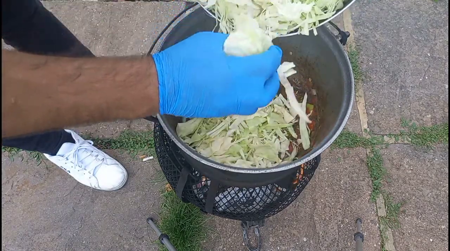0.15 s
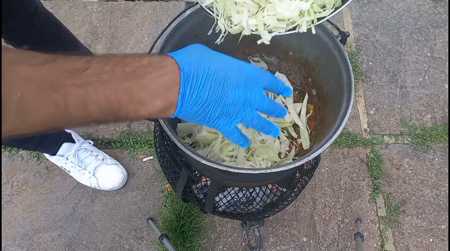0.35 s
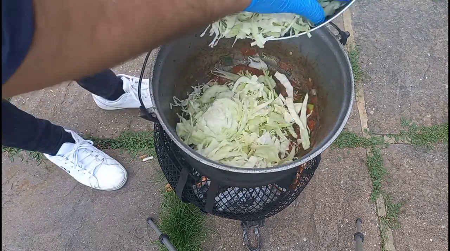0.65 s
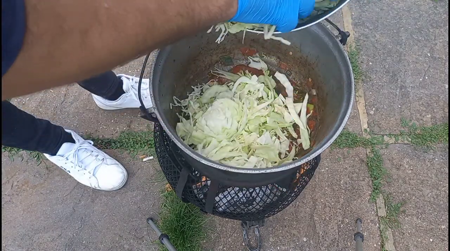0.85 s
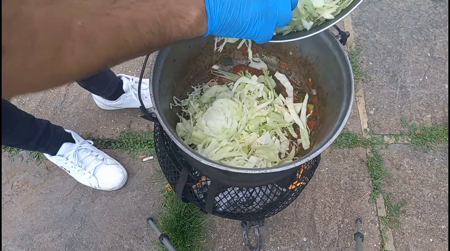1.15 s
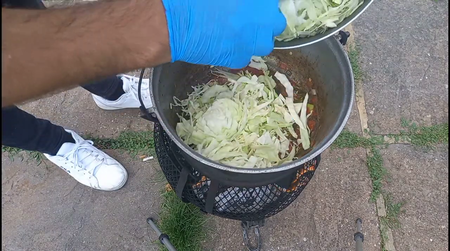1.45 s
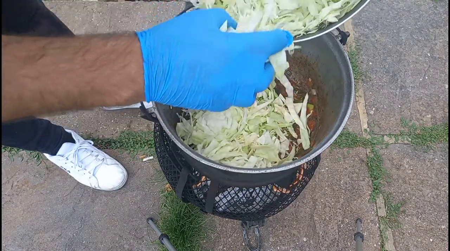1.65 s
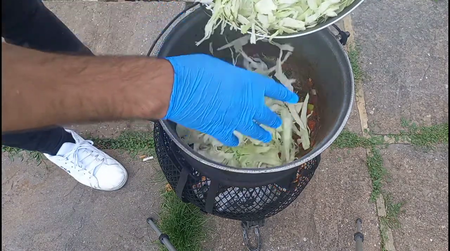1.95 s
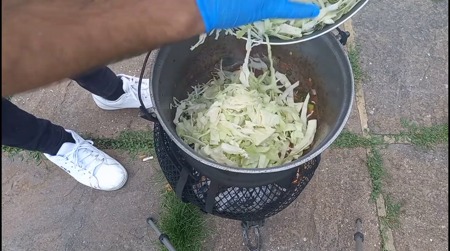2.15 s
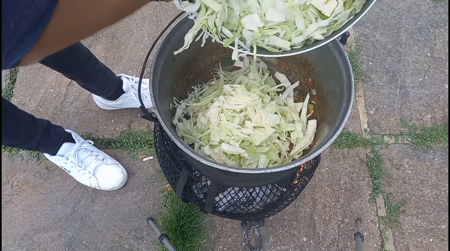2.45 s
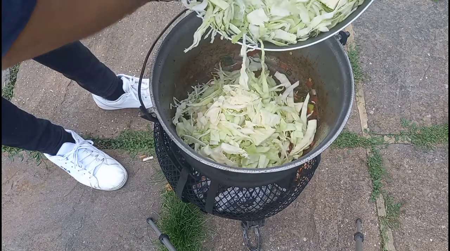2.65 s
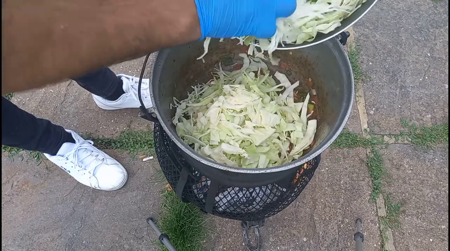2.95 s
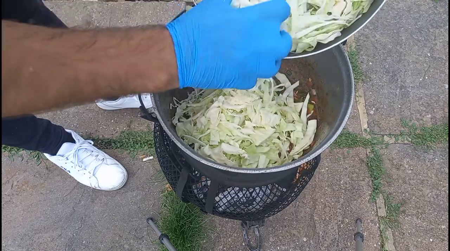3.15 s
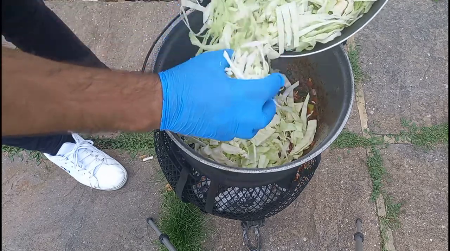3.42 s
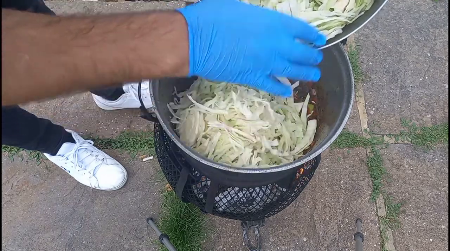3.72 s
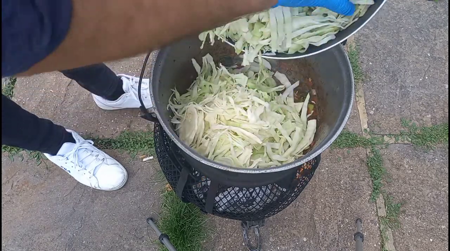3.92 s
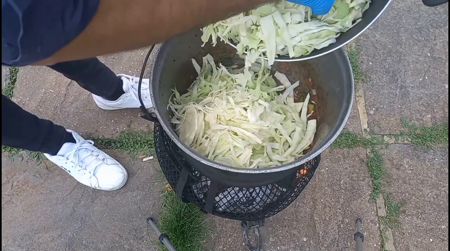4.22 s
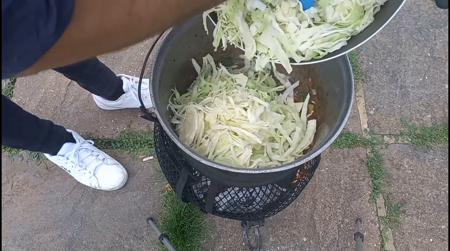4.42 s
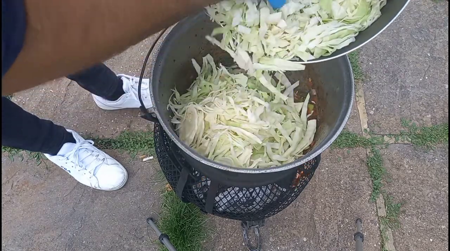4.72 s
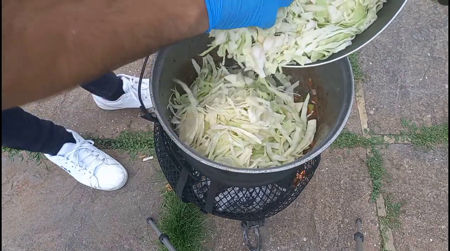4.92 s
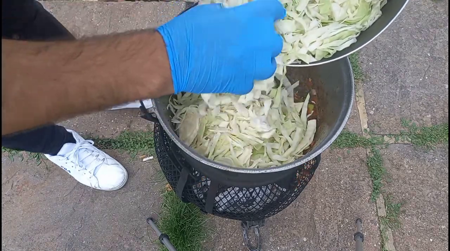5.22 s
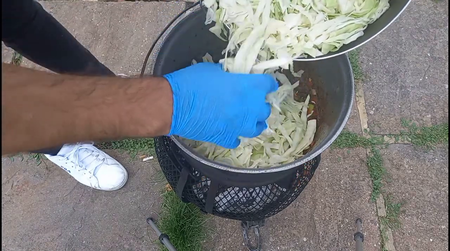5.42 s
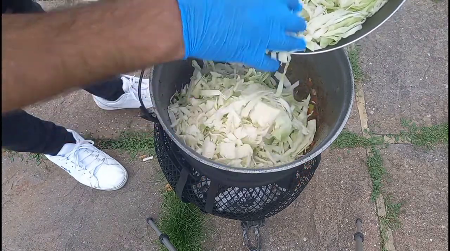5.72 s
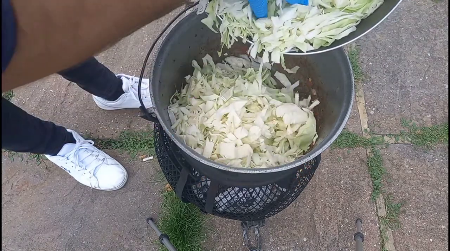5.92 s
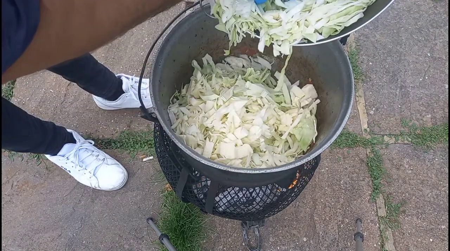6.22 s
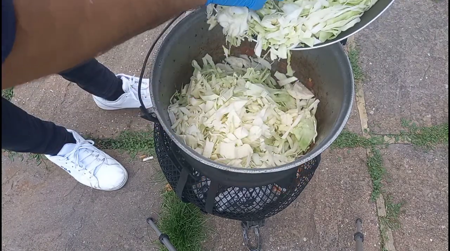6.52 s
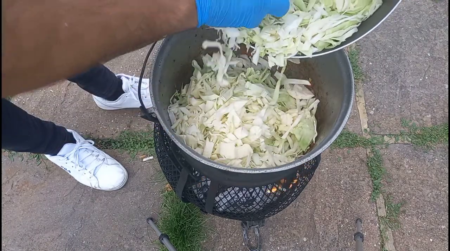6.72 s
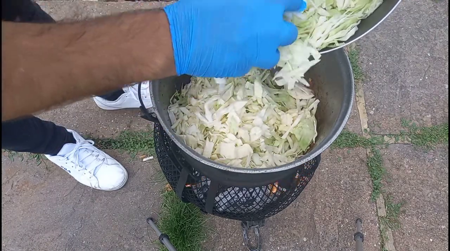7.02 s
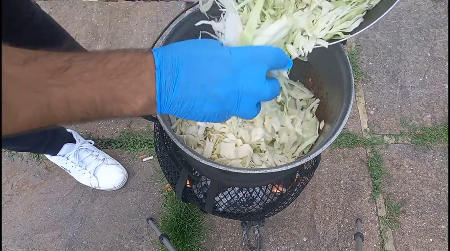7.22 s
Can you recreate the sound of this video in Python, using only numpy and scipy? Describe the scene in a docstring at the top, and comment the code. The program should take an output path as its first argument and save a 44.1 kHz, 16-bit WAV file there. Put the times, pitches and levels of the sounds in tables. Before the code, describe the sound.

Close outdoor sound of a pot sizzling over a fire, growing quieter as shredded cabbage covers the sauce. Leaves rustle in soft handfuls, with brittle snaps and a glove rubbing a metal bowl. Two small metallic knocks come early and near the middle, then a strong burst of hollow thumps and crunchy scraping, followed by gentler rakes. Low wind bumps the microphone.

```python
"""Raking cabbage into a sizzling pot

Sauce sizzles in an iron pot over a fire outdoors while a gloved hand rakes shredded cabbage out of a metal bowl.
Sizzle and leaves are grainy noise; rubs and thumps ring the bowl; knocks are bursts of noise that ring metal.
Snaps are short tones with noise. Low lumpy noise is wind on the microphone, over a steady outdoor murmur.
"""
import sys
import numpy as np
from scipy import signal
from scipy.fft import rfft, irfft, next_fast_len
from scipy.io import wavfile

SR = 44100
rng = np.random.default_rng(int(sys.argv[2]) if len(sys.argv) > 2 else 0)


def materialize(psi):
    """Save the field psi as 16-bit PCM at rate SR to the path in sys.argv[1].

    A 1-D psi becomes a single channel; in a 2-D psi each row is a channel.
    """
    bounded = np.clip(np.atleast_2d(psi).T, -1, 1)
    quanta = np.round(bounded * 32767).astype(np.int16)
    wavfile.write(sys.argv[1], SR, quanta)


N = 325017

# Wind over time: start_s, deep_db, upper_db, left_minus_right_db
WIND = [(0.0, -58, -45, 1.5), (.1, -60, -61.5, 0), (.3, -49.5, -52, 3), (.6, -61, -57, 1),
        (.9, -51.5, -57.5, -2.5), (1.07, -66, -64, -2), (1.4, -56, -57.5, -0.5), (1.62, -52, -57, 1),
        (1.8, -75, -66, 1), (2.15, -59.5, -60, 2.5), (2.35, -70, -66, -1), (2.95, -70, -65.5, 0.5),
        (3.15, -72, -58.5, -4), (3.6, -76, -70, 0), (4.45, -72, -57, -1), (4.62, -56, -51.5, -1),
        (5.05, -70, -62.5, 0), (5.22, -54.5, -54, -0.5), (5.85, -69, -64.5, -3.5), (6.1, -55, -52, 0.5),
        (6.5, -58, -60, 1.5), (7.05, -53, -57, 5), (7.19, -70, -65, 11), (7.31, -48, -51.5, 11),
        (7.37, -57, -58, -2)]
# The sauce quietens as cabbage covers it: start_s, level_db
SIZZLE = [(0.0, -60.5), (1.1, -60), (1.6, -64.5), (3.5, -70.5), (5.8, -71), (7.37, -70.5)]
# Tone colour of the outdoor murmur: pitch_hz, relative level_db (per Hz)
AIR_COLOUR = [(76, -18), (130, -3), (174, -1), (408, -3), (516, -13), (796, -5.5), (1230, -15),
              (2560, -24.5), (3000, -86), (3900, -38), (6600, -120)]
# Tone colour of the frying: pitch_hz, relative level_db (per Hz)
SIZZLE_COLOUR = [(880, -42), (1500, -6), (2260, -9), (2470, -5.5), (2890, -0.5), (3950, -2), (5720, -3),
                 (15500, -16.5)]
# Tone colour of the leaves: pitch_hz, relative level_db (per Hz)
LEAF_COLOUR = [(500, -12), (900, -1), (1800, 0.5), (5000, 1.5), (9000, 1), (14000, 4), (16000, -7)]
# How alike left and right are: pitch_hz, likeness (1 = the same, 0 = unrelated)
LIKENESS = [(60, 0.91), (130, 0.81), (290, 0.88), (640, -0.0068), (1410, 0.78), (3100, 0.21), (6820, 0.13),
            (15000, -0.14)]
# Ringing modes of the bowl: pitch_hz, width_hz, relative level_db
BOWL_MODES = [(255, 73, -6), (366.2, 81, 6.5), (382.6, 13.3, -6.5), (426.4, 74, 5), (524, 94, -15),
              (641, 90, -7), (764, 51, -12), (984, 58, -15), (1313, 190, -10), (1493, 330, -17.5),
              (1804, 58, -16.5), (2410, 84, -16)]
# Soft thumps on the bowl: start_s, level_db (before the soft rise), favoured_pitch_hz
THUMPS = [(0.672, -41.5, 370), (1.97, -42, 368), (2.358, -35.5, 336), (2.541, -43, 393),
          (3.088, -42.5, 246), (3.13, -39, 248), (3.172, -45, 330), (4.095, -43, 343), (4.156, -29, 443),
          (4.265, -24.5, 664), (4.301, -18, 450), (4.358, -20.5, 535), (4.39, -29, 396),
          (4.479, -42.5, 428), (4.691, -31, 420), (4.826, -36, 480), (4.755, -38, 420), (4.914, -38, 247),
          (4.969, -37, 345), (5.999, -28.5, 348), (6.02, -41, 250), (6.074, -36, 400), (6.14, -39, 400),
          (6.19, -43, 400), (6.264, -42, 1400), (6.46, -51, 1510)]
# Metal knocks and scuffs: start_s, crack_db, rattle_t60_s, ring_drive_db, favoured_pitch_hz
KNOCKS = [(1.158, -65, 0.27, -61, 2100), (1.181, -66, 0.21, -57.5, 3080), (1.2491, -30, 0.027, -53, 4020),
          (1.2535, -39, 0.036, -51, 3700), (1.263, -56, 0.12, -54.5, 2980),
          (3.0729, -30.5, 0.032, -40, 3760), (3.0775, -42, 0.056, -47, 2340),
          (3.0867, -31, 0.023, -42.5, 2020), (3.09, -60, 0.065, -44.5, 202), (3.101, -52, 0.13, -47, 3200),
          (3.135, -73, 0.19, -48.5, 199), (3.175, -65, 0.24, -60, 850)]
# Ringing modes of the knocked metal: pitch_hz, relative level_db, t60_s
METAL_MODES = [(162, -0.5, 0.12), (224.7, 2, 0.13), (800, 2, 0.14), (910, 5, 0.1), (1350, -1, 0.084),
               (1540, -14, 0.1), (2091, -4, .35), (2097, -8, .25), (2450, 0, 0.036), (2770, -4, 0.078),
               (2930, 0, 0.063), (3270, -1, 0.08), (3660, -3, 0.094), (3700, -1, 0.071), (4370, -6, 0.036),
               (6740, -4, 0.036)]
# Tone colour of the cracks: pitch_hz, relative level_db (per Hz)
CRACK_COLOUR = [(700, -12), (2000, -14), (3800, 0.5), (7000, 2.5), (10000, -5.5), (16000, -15.5)]
# Snaps and crunches of leaves and embers, each at a set time: start_s, level_db, pitch_hz, left_minus_right_db
SNAPS = [(0.308, -54, 6760, -1), (0.8586, -47, 7250, -1), (2.5217, -47, 7400, -3), (2.5565, -44, 8840, 1),
         (2.747, -44, 7160, 0), (2.8695, -60, 7300, -13), (3.9926, -40.5, 11400, -1),
         (4.2956, -39, 7660, -2), (5.1063, -27.5, 8470, -1), (5.2718, -50, 12200, 0),
         (5.3664, -46.5, 8660, -1), (5.3951, -49, 11200, 0), (5.9666, -38, 7860, 2),
         (6.0255, -43, 7150, -1), (6.223, -50, 3260, -4), (6.272, -52, 6800, 0), (6.437, -41, 3070, 3),
         (6.4722, -43.5, 3630, -4.5), (7.3013, -51, 4800, 3)]
# Faint thin tones: start_s, end_s, pitch_hz, width_hz, level_db
THIN_TONES = [(0.01, .25, 1670, 200, -77), (.28, 0.527, 1710, 160, -70), (6.13, 6.356, 1460, 120, -66),
              (5.186, 5.802, 987, 120, -76), (5.583, 5.793, 1570, 15, -76.5), (5.667, 5.74, 2090, 30, -80),
              (7.073, 7.12, 6900, 400, -73)]
# Rustles of the cabbage: peak_s, rise_s, fall_s, level_db, lows_boost_db (rise and fall cover 20 dB)
RUSTLES = [(0.0, .05, 0.45, -67, 12), (.45, 0.055, 0.077, -51.5, 7), (.69, 0.033, 1, -59.5, 0.5),
           (1.05, 0.64, .5, -60.5, 3.5), (1.28, 0.15, 0.15, -59, 13), (1.98, 0.045, 0.12, -55.5, 6),
           (2.37, 0.062, 0.34, -56.5, -9), (2.55, 0.098, 1, -52.5, 2), (2.72, 0.22, 0.11, -58, 1),
           (3.0, 0.034, 0.046, -69, -9), (3.12, 0.039, 0.24, -61, 16), (3.64, 0.077, 0.099, -57.5, 5),
           (3.995, 0.044, 0.14, -57, -21), (4.2, 0.21, 0.09, -47.5, 2), (4.27, 0.08, 0.044, -45.5, 10.5),
           (4.32, 0.086, .15, -43, -3), (4.385, 0.12, 0.028, -47.5, 14.5), (4.67, 0.26, 0.49, -49, -0.5),
           (4.86, 0.078, 0.075, -57.5, 1), (5.12, 0.038, 0.72, -62.5, 3), (5.38, 0.16, 0.13, -62, -14),
           (5.56, .06, 0.17, -58.5, 3), (5.97, 0.074, 0.17, -56.5, -13), (6.02, 0.048, 0.33, -55, 2),
           (6.17, 0.26, 0.17, -54.5, 4), (6.275, 0.16, 0.11, -50, 6.5), (6.36, .1, 0.36, -54.5, 2.5),
           (6.47, 0.11, 0.2, -58, 9), (6.56, 0.16, 0.37, -58, 2.5), (6.8, 0.34, 0.55, -65.5, -7),
           (7.3, 0.43, 0.42, -65, 3)]
# Rubs of the glove on the bowl: peak_s, rise_s, fall_s, drive_db, upper_modes_boost_db (20 dB rise and fall)
RUBS = [(.3, 0.19, 0.47, -68.5, 5.5), (.69, 0.073, 0.099, -62, 5.5), (.88, 0.17, 0.7, -66.5, 1),
        (1.29, 0.15, 0.25, -62.5, 11), (1.98, .03, 0.17, -59, 6), (2.42, 0.071, 0.18, -61.5, 2),
        (2.55, 0.12, .4, -62, -3), (3.18, 0.25, 0.12, -56.5, 4), (4.2, 0.061, .15, -43, -8),
        (4.27, 0.13, 0.16, -37, 8.5), (4.35, 0.11, 0.059, -35.5, 6.5), (4.41, 0.17, 0.054, -41, -0.5),
        (4.5, 0.11, 0.21, -57.5, 2), (4.7, .08, .15, -45, 1.5), (4.82, 0.088, 0.13, -52, 5),
        (4.93, 0.057, .12, -50.5, -1), (5.3, 0.26, 0.26, -71, 9.5), (6.0, 0.062, .1, -50, -5),
        (6.1, 0.076, 0.62, -52, 0.5), (6.29, 0.3, 0.052, -55.5, 7), (6.4, .06, 0.17, -65.5, 11),
        (6.85, 0.27, 0.24, -72, 16)]

LAG_SAMPLES = -4   # shifts the left port: it hears first
PORT_HZ, PORT_WIDTH_HZ, PORT_DB = 7270, 1600, -2
STOP_HZ = 16400   # from here up the sound is 60 dB down
AIR_DB = -66.5   # open air and fire
WIND_LUMP_DB, WIND_LUMP_RATE_HZ = 1.5, 9.9
SNAP_T60_S = 0.013
FAINT_SNAP_DB, FAINT_SNAP_SPREAD_DB, FAINT_SNAP_HZ = -55.5, 3.5, 7600   # typical level, its spread, typical pitch
FIRST_TOUCH = 1.27   # size of the opening tap, against the rattle after it
FAVOUR_WIDTH = 0.64   # width of the favoured band, as a share of its pitch
THUMP_T60_S, THUMP_SPREAD_OCT, THUMP_RISE_S = .075, 0.31, 0.0053
STIRRED_DB = -4.5   # sizzle roused by falling leaves, against their rustle


def from_db(db):
    """Turn decibels into gain."""
    return 10 ** (np.asarray(db) / 20)


def rms_one(x):
    """Scale a signal to an average strength (rms) of 1."""
    return x / np.sqrt(np.mean(x ** 2) + 1e-20)


def in_time(rows):
    """Draw straight lines between the rows of a table: one value per sample for each column."""
    s, *columns = np.transpose(rows)
    return [np.interp(np.arange(N) / SR, s, column) for column in columns]


def at_hz(points, hz):
    """Read a colour table at any pitch, with pitch on a log scale."""
    table_hz, value = np.transpose(points)
    return np.interp(np.log(hz), np.log(table_hz), value)


def swells(rows):
    """Rows rise and fall straight in dB and their powers add; gives level dB and the weighted last column."""
    t = np.arange(0, N + 64, 64) / SR   # one point every 64 samples is enough
    power, extra = 1e-12, 0
    for peak_s, rise_s, fall_s, db, more in rows:
        steps_down = np.maximum((peak_s - t) / rise_s, (t - peak_s) / fall_s)
        row_power = from_db(2 * db - 40 * steps_down)   # doubled dB: power, not gain
        power = power + row_power
        extra = extra + row_power * more
    curves = (10 * np.log10(power), extra / power)
    return [np.interp(np.arange(N) / SR, t, curve) for curve in curves]


def drift(rate_hz):
    """Slow random wander of spread 1: noise smoothed at a low sample rate, then stretched."""
    r = np.exp(-80 * np.pi * rate_hz / SR)   # one slow step is 40 samples
    noise = rng.standard_normal(N // 40 + 2002)
    slow = signal.lfilter([1], [1, -2 * r, r * r], noise)[2000:]   # skip the start-up
    return np.interp(np.arange(N) / 40, np.arange(len(slow)), rms_one(slow))


def resonance(x, hz, width_hz):
    """Let through a band around one pitch, with gain 1 at its top."""
    r = np.exp(-np.pi * width_hz / SR)
    top = np.array([1, 0, -1]) * (1 - r * r) / 2
    return signal.lfilter(top, [1, -2 * r * np.cos(2 * np.pi * hz / SR), r * r], x + 1e-18)


def ring(clicks, hz, t60_s):
    """A click of size 1 starts a dying sine of about height 1; it falls 60 dB in t60."""
    r, w = 1000 ** (-1 / (t60_s * SR)), 2 * np.pi * hz / SR
    return signal.lfilter([0, np.sin(w)], [1, -2 * r * np.cos(w), r * r], clicks + 1e-18)


def coloured(pair, spectrum):
    """Mix two unrelated signals into left and right with a set colour and likeness; rms 1."""
    size = next_fast_len(N)
    hz = np.maximum(np.arange(size // 2 + 1) * SR / size, 1)
    alike = np.clip(at_hz(LIKENESS, hz), -1, 1)
    mid, side = rfft(pair, size)
    both = np.sqrt(1 + alike) * mid + np.sqrt(1 - alike) * side * [[1], [-1]]
    left, right = irfft(both * from_db(at_hz(spectrum, hz)), size)[:, :N]
    return rms_one(np.array([np.roll(left, LAG_SAMPLES), right]))


def grains(spread_db, clump_db, clump_rate_hz):
    """Dense tiny bursts: noise whose size jumps about every millisecond and clumps; both channels share the sizes."""
    jumps = np.minimum(rng.exponential(1, N // 44 + 1), 6)
    jumps = np.repeat(jumps, 44)[:N]
    size = from_db(spread_db * jumps + clump_db * drift(clump_rate_hz))
    return size * rng.standard_normal((2, N))


def open_air():
    """Steady outdoor murmur of air and fire: coloured noise that wavers gently."""
    noise = from_db(2.1 * drift(9)) * rng.standard_normal((2, N))
    return from_db(AIR_DB) * coloured(noise, AIR_COLOUR)


def wind():
    """Air buffets the microphone: lumpy low noise, partly its own at each port."""
    deep_db, upper_db, pan_db = in_time(WIND)
    noise = coloured(rng.standard_normal((2, N)), [(10, -27), (30, 3), (45, 15.0), (20000, 4.0)])
    deep = rms_one(resonance(resonance(noise, 47.3, 30), 49.0, 33.4))
    moved = np.roll(noise, SR, axis=1)   # moved by a second, so that it does not follow the deep part
    upper = rms_one(resonance(resonance(moved, 80.5, 39.5), 60, 98))
    lumps = from_db(WIND_LUMP_DB * drift(WIND_LUMP_RATE_HZ))
    pan = from_db(pan_db * [[.5], [-.5]])
    return pan * lumps * (from_db(deep_db) * deep + from_db(upper_db) * upper)


def thin_tones():
    """Faint thin tones: narrow bands of noise that waver, swell and fade."""
    t, out = np.arange(N) / SR, 0
    for start_s, end_s, hz, width_hz, db in THIN_TONES:
        swell = np.sin(np.pi * np.clip((t - start_s) / (end_s - start_s), 0, 1)) ** 0.35
        noise = rng.standard_normal(N) + .6 * rng.standard_normal((2, N))   # shared part + own part
        tone = rms_one(resonance(resonance(noise, hz, width_hz), hz, width_hz))
        out = out + from_db(db) * swell * tone
    return out


def faint_snaps():
    """Rows for 20 small snaps at random times, laid out like the table of timed snaps."""
    when = rng.uniform(0, N / SR, size=20)
    odds = rng.standard_normal((20, 3))
    db = FAINT_SNAP_DB + FAINT_SNAP_SPREAD_DB * odds[:, 0]
    hz = FAINT_SNAP_HZ * 2 ** (0.14 * odds[:, 1])
    return np.transpose([when, db, hz, 2 * odds[:, 2]])


def snaps():
    """Leaves and embers snap: a broad click with a brief ring and a quicker puff of debris."""
    out, t = np.zeros((2, N)), np.arange(2000) / SR
    bright = signal.butter(2, 2000, "high", fs=SR, output="sos")
    fade, rise = 1000 ** (-t / SNAP_T60_S), np.minimum(t / 0.0003, 1) ** 2
    for s, db, hz, pan_db in [*faint_snaps(), *SNAPS]:
        noise = rng.standard_normal((2, len(t)))
        tone = np.sin(2 * np.pi * hz * t + 0.41 * noise[:, :1])   # each side starts at a slightly different phase
        puff = (fade + 0.25) * signal.sosfilt(bright, noise)
        snap = rise * fade * (0.75 * tone + 1.13 * puff)
        gain = from_db(db + pan_db * np.array([[.5], [-.5]]))
        i = round(s * SR)
        out[:, i:i + len(t)] += (gain * snap)[:, :N - i]
    return out


def knocks():
    """Each metal contact rattles for a moment: heard as a crack, and driving the modes of the metal."""
    crack = coloured(rng.standard_normal((2, N)), CRACK_COLOUR)
    out, drive = np.zeros((2, N)), np.zeros((2, N))
    t = np.arange(SR // 2) / SR
    dull = signal.butter(1, 2500, fs=SR, output="sos")
    for s, crack_db, t60_s, ring_db, favoured_hz in KNOCKS:
        i, fade = round(s * SR), 1000 ** (-t / t60_s)
        span = slice(i, i + len(t))
        out[:, span] += from_db(crack_db) * fade * crack[:, span]
        noise = rng.standard_normal((3, len(t)))
        low = signal.sosfilt(dull, noise)
        rattle = low[0] + noise[1:] - low[1:]   # the ports share the lows only
        contact = fade * rattle / np.sqrt(np.sum(fade ** 2)) + FIRST_TOUCH * (t == 0)
        width_hz = FAVOUR_WIDTH * favoured_hz
        favoured = resonance(resonance(contact, favoured_hz, width_hz), favoured_hz, width_hz)
        drive[:, span] += from_db(ring_db) * favoured
    return out + sum(from_db(db) * ring(drive, hz, t60_s) for hz, db, t60_s in METAL_MODES)


def thumps():
    """A soft blow rings the bowl modes near the pitch that its spot favours."""
    out, t = np.zeros(N), np.arange(SR // 4) / SR
    hz, _, mode_db = np.transpose(BOWL_MODES)
    modes = np.sin(2 * np.pi * hz[:, None] * t)
    shape = 1000 ** (-t / THUMP_T60_S) * (1 - np.exp(-t / THUMP_RISE_S))
    for s, db, favoured_hz in THUMPS:
        octaves_off = np.log2(hz / favoured_hz)
        share = from_db(mode_db - 10 * (octaves_off / THUMP_SPREAD_OCT) ** 2)
        i = round(s * SR)
        out[i:i + len(t)] += from_db(db) * shape * (share / share.sum() @ modes)
    return np.array([np.roll(out, LAG_SAMPLES), out])


def sizzle():
    """Fine crackle of the frying sauce, roused when leaves fall in."""
    crackle = coloured(grains(1.08, 2.0, 17), SIZZLE_COLOUR)
    steady = from_db(in_time(SIZZLE)[0])
    stirred = from_db(swells(RUSTLES)[0] + STIRRED_DB)
    return np.hypot(steady, stirred) * crackle   # powers add


def glove_rubs():
    """The glove sticks and slips on the bowl: rough noise sets the bowl modes humming."""
    glove_db, grip_db = swells(RUBS)
    noise = rng.standard_normal(N) + 0.052 * rng.standard_normal((2, N))   # nearly the same on both sides
    rub = from_db(glove_db + 2.78 * drift(70)) * noise
    firm = from_db(grip_db) * rub
    hum = np.zeros((2, N))
    for hz, width_hz, db in BOWL_MODES:
        push = firm if hz > 600 else rub   # the grip changes the upper modes only
        mode = resonance(resonance(push, hz, width_hz), hz, 1.3 * width_hz)
        hum += from_db(db + 34) / np.sqrt(width_hz) * mode   # wide bands pass more noise, so even them out
    return np.array([np.roll(hum[0], LAG_SAMPLES), hum[1]])


def cabbage_rustles():
    """Leaves slide and crumple: grainy noise, its lower part boosted or softened from rustle to rustle."""
    leaf_db, lower_db = swells(RUSTLES)
    leaves = coloured(grains(1.67, 1.95, 38), LEAF_COLOUR)
    dull = signal.sosfilt(signal.butter(2, 4500, fs=SR, output="sos"), leaves)
    return from_db(leaf_db) * (from_db(lower_db) * dull + leaves - dull)


def scene():
    """All sources together, from the background to the hand."""
    background = open_air() + wind() + thin_tones()
    hits = snaps() + knocks() + thumps()
    return background + hits + sizzle() + glove_rubs() + cabbage_rustles()


def record(dry):
    """The microphone port rings a little in the treble; a steep filter cuts the top."""
    wet = dry + from_db(PORT_DB) * resonance(dry, PORT_HZ, PORT_WIDTH_HZ)
    return signal.sosfilt(signal.cheby2(16, 60, STOP_HZ, fs=SR, output="sos"), wet)


dry = scene()
out = record(dry)
materialize(out)
```